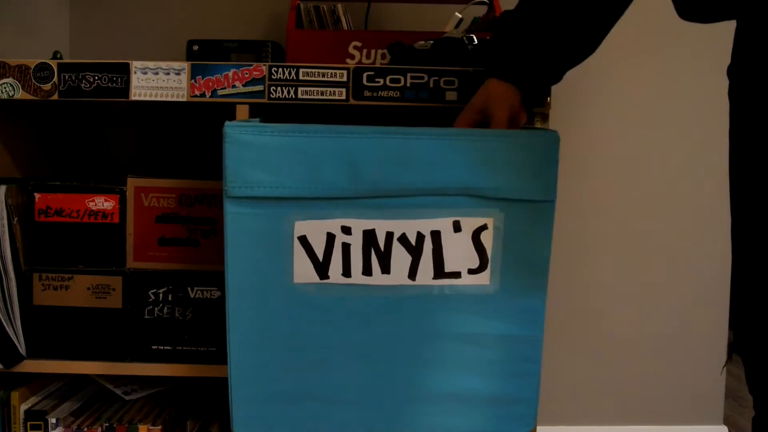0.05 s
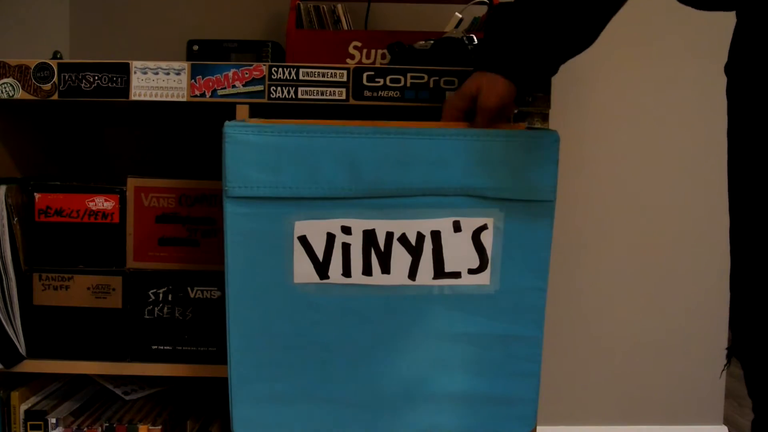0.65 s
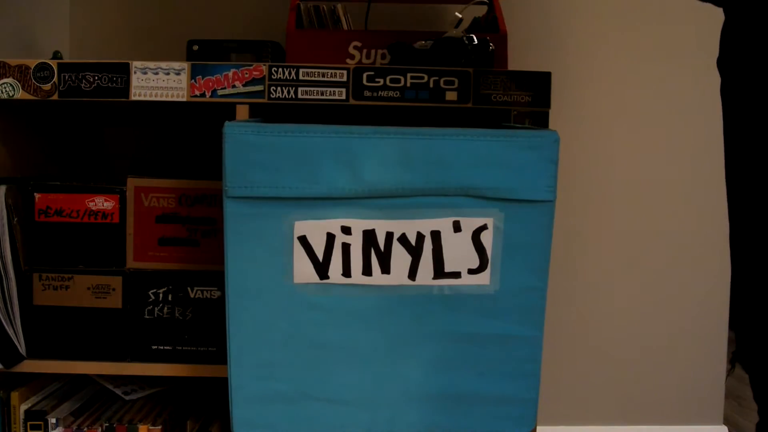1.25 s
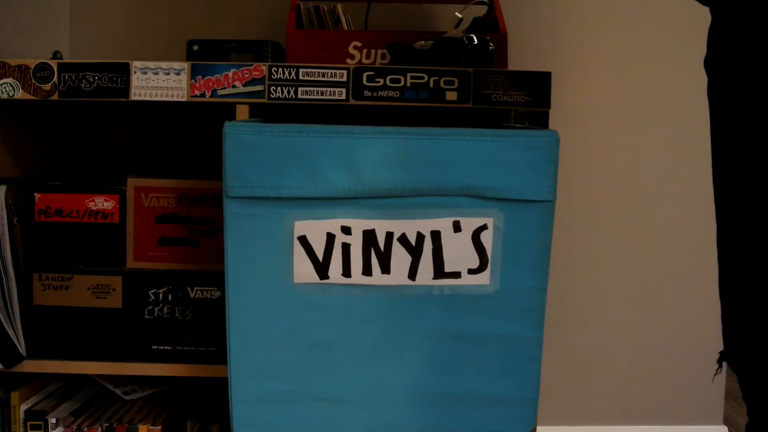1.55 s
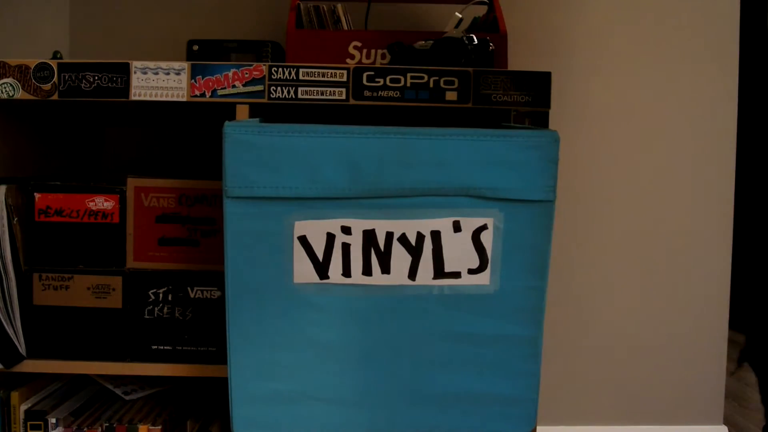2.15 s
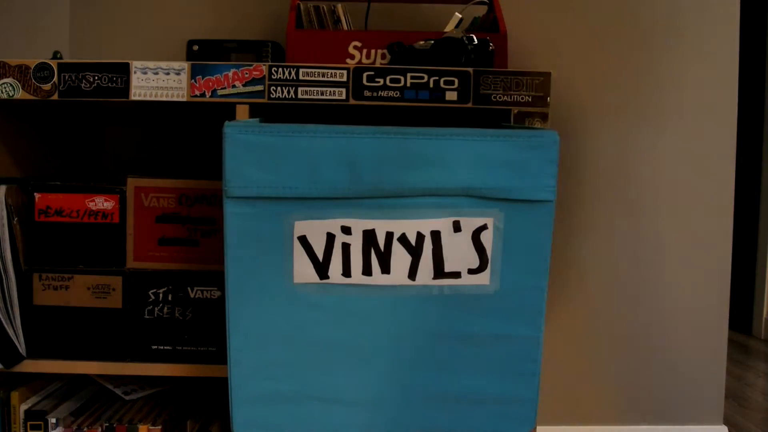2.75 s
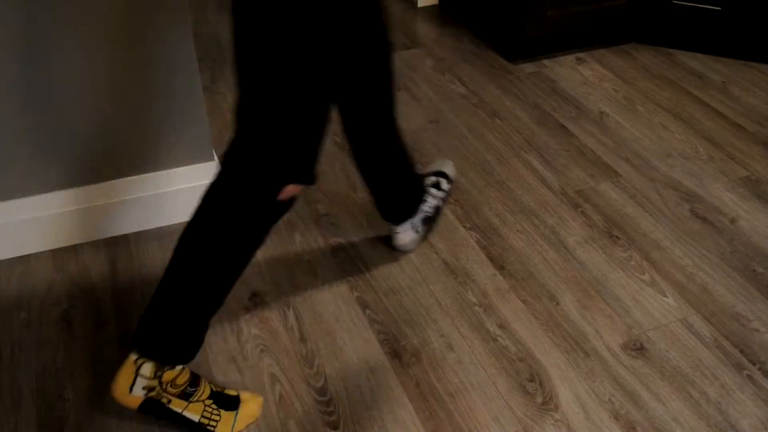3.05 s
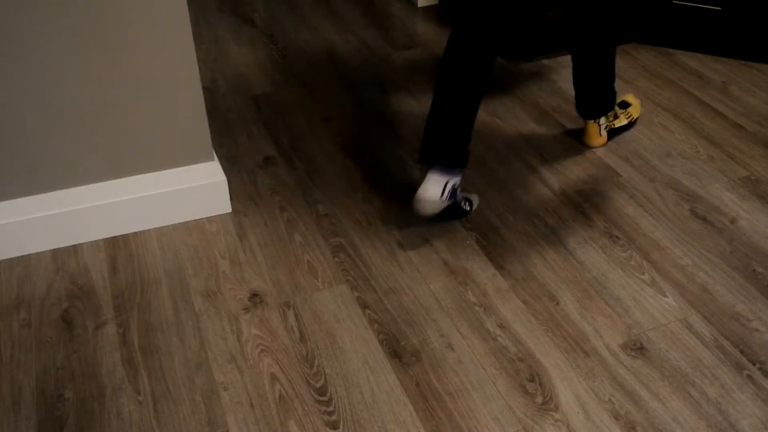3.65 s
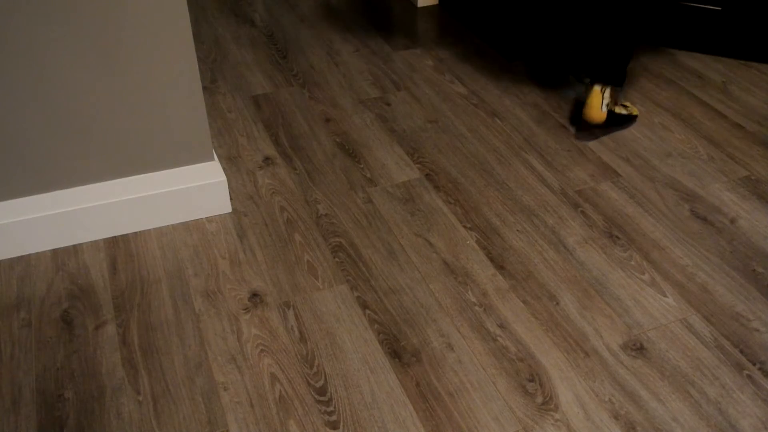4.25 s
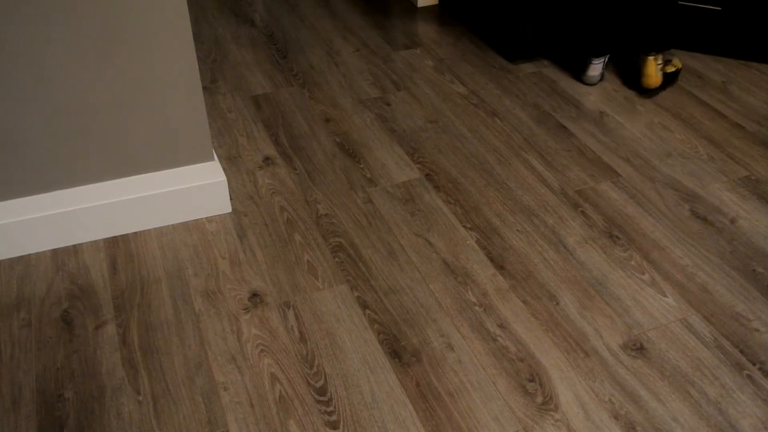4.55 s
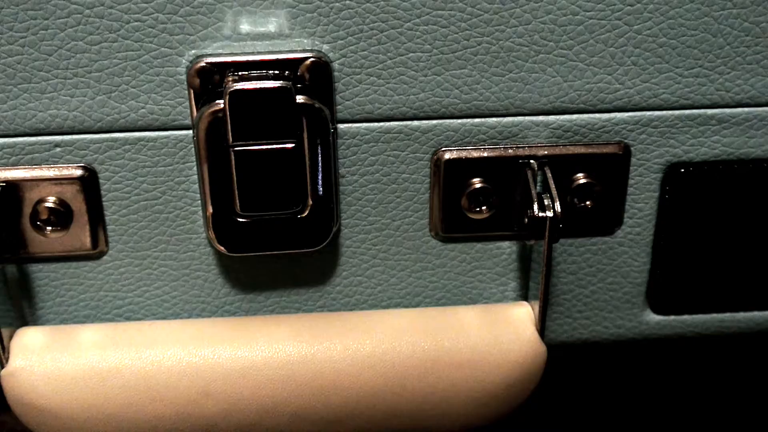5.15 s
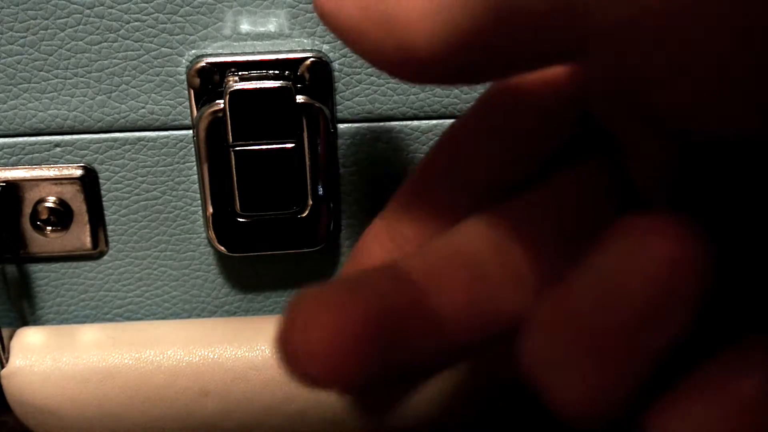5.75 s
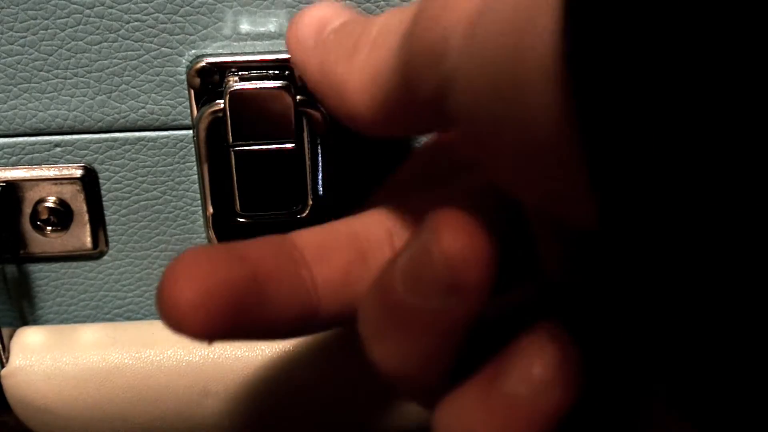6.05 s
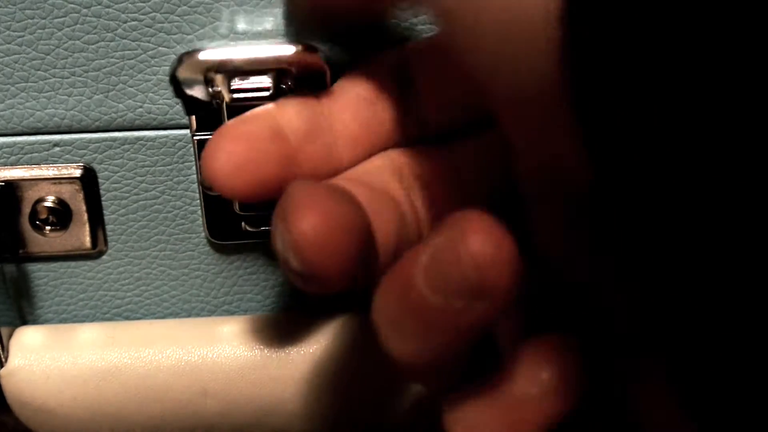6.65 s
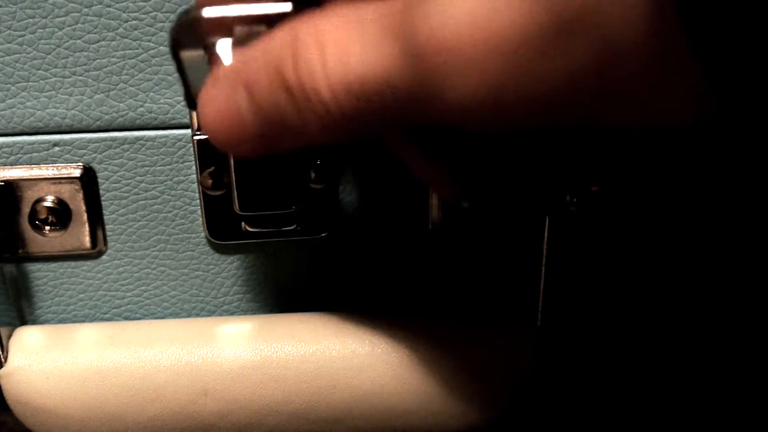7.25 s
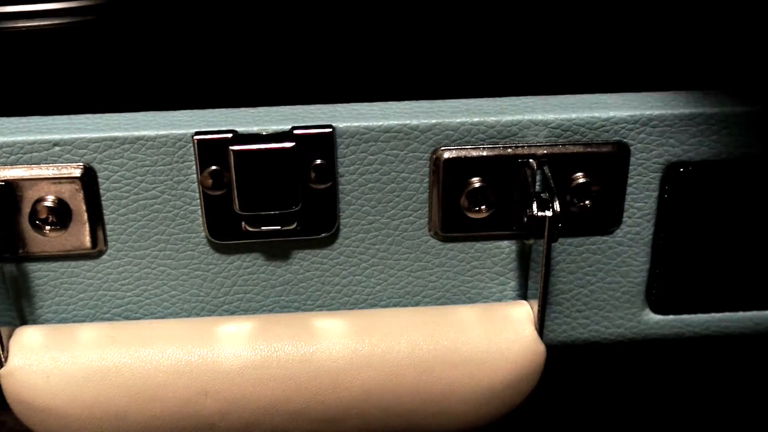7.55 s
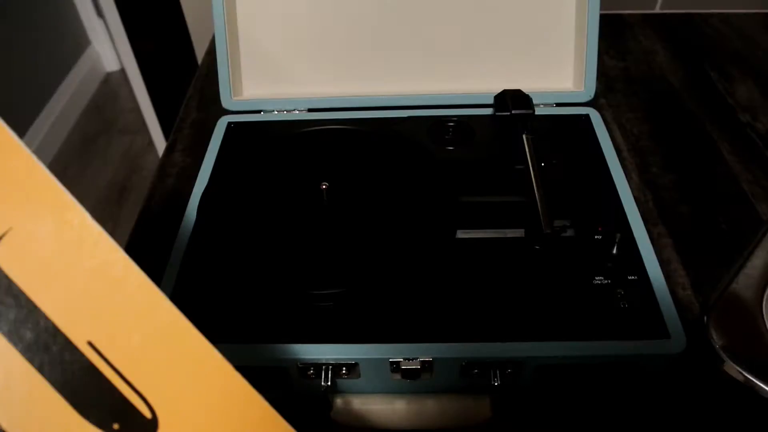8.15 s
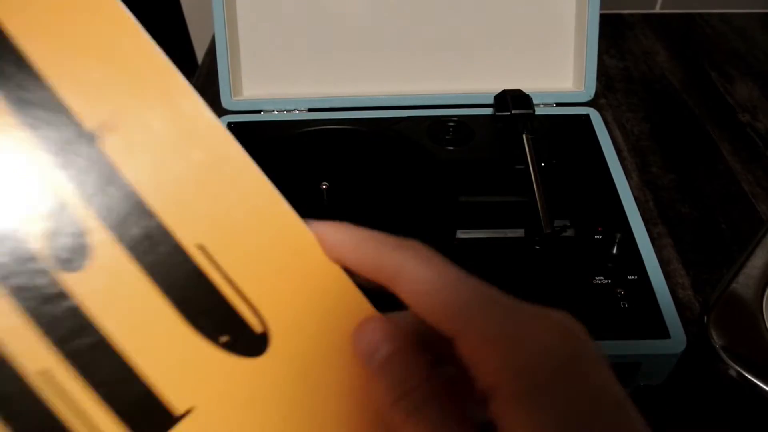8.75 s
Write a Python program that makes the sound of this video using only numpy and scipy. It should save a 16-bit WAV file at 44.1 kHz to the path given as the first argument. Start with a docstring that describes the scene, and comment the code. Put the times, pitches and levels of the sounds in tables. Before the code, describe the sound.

Quiet cardboard scraping and socked steps on creaky boards lead to one sharp latch snap and a lid's light knocks in a small room.

```python
"""A record sleeve rasps out of a fabric box, by stick-slip friction of card on cloth.
It is carried in socks across a laminate floor, whose loaded boards slip and creak.
Close by comes the loudest sound: the metal latch of a suitcase record player snaps open, its impacts
exciting the modes of steel and case. The lid is lifted, then the sleeve is handled again.
The room is small and fairly live, with a faint hum and hiss."""
import sys
import numpy as np
from scipy import signal
from scipy.fft import rfft, irfft, next_fast_len
from scipy.io import wavfile
from scipy.ndimage import uniform_filter1d

SR = 44100
rng = np.random.default_rng(int(sys.argv[2]) if len(sys.argv) > 2 else 0)


def master(y):
    """Save y as 16-bit WAV."""
    cut = np.clip(np.atleast_2d(y).T, -1, 1)
    pcm = np.round(cut * 32767)  # scale
    wavfile.write(sys.argv[1], SR, pcm.astype(np.int16))


N = 397341
TIME = np.arange(N) / SR
CUTOFF_HZ = 16000


# fingers and steel on the latch: (time [s], thump [dB], knock [dB], click [dB], contact time [s])
LATCH_CONTACTS = [(5.901, -38, -36.5, -26.5, 0.01), (6.03, -47.5, -55, -32, 0.0056),
                  (6.42, -54, -34, -22.5, 0.007), (6.4577, -37, -19, -44, 0.0017),
                  (6.4654, -45, -10.5, -6, 0.0022), (6.4699, -53, -24, -2, 0.0028)]
# modes of the steel: (frequency [Hz], level [dB], T60 [s])
STEEL_MODES = [(2170, -29, 0.5), (2403, -24, 0.95), (2530, 3.5, 0.041), (5870, 3.5, 0.03), (7200, 4, 0.03),
               (7600, 12, 0.018), (11150, 2, 0.069), (11300, 12.5, 0.008), (12300, 8, .014),
               (14300, 11, 0.009)]
# contact noise of steel: (frequency [Hz], spectral level [dB])
STEEL_SPECTRUM = [(500, -68), (1500, 4.5), (2500, 4), (3600, -3.5), (7000, 3.5), (9500, -1.5), (11500, 9),
                  (15500, 1)]

def latch():
    """Impact excitation: steel strikes steel, ringing its high modes and driving the case beneath."""
    onset, thump_db, knock_db, click_db, length = np.transpose(LATCH_CONTACTS)
    steel = ring(impacts(onset, click_db, length, chatter=0.73), STEEL_MODES)
    clicks = from_db(-1.5) * steel + from_db(-5) * contact_noise(onset, click_db, length, STEEL_SPECTRUM)
    return wooden_case(onset, thump_db, knock_db, length) + clicks * pan(left_db=5.5)


# fingers land on the case, the lid springs free and is lifted, the sleeve is set against it:
# (time [s], thump [dB], knock [dB], spot frequency [Hz], snap [dB], contact time [s])
LID_KNOCKS = [(5.874, -33.5, -32.5, 725, -49, 0.015), (5.9, -44, -27.5, 1360, -43, 0.009),
              (6.211, -44.5, -35, 644, -45.5, 0.017), (6.274, -51, -39, 900, -37.5, 0.0032),
              (6.315, -40, -31.5, 480, -38, 0.0097), (6.397, -41, -27, 910, -41, 0.012),
              (6.488, -38, -36, 76, -54, 0.012), (6.526, -40, -44, 124, -52, 0.0072),
              (7.065, -54, -36, 930, -62, 0.0023), (7.253, -50, -38.5, 800, -67, 0.013),
              (7.271, -40.5, -41, 190, -68, 0.02), (7.405, -33, -28.5, 594, -47, 0.022),
              (7.5202, -39, -38.5, 800, -30, 0.0062), (7.59, -51, -35.5, 364, -52, 0.029),
              (7.65, -31.5, -29.5, 606, -26.5, 0.0073), (7.658, -39, -34, 191, -46, 0.01),
              (7.676, -37, -34, 130, -41, 0.0093), (8.138, -58, -39.5, 382, -56, 0.0076),
              (8.538, -44, -40, 121, -39, 0.0066), (8.544, -43, -33.5, 460, -34.5, 0.019),
              (8.983, -41.5, -42, 240, -45, 0.015)]
# contact noise of lid and rim: (frequency [Hz], spectral level [dB])
SNAP_SPECTRUM = [(300, -8), (1200, 4.5), (2800, 10.5), (4500, 5.5), (8500, 1), (15000, -6.5)]

def lid(ring_cycles=10.7):
    """Local resonance: each knock has the pitch of the spot struck; lid and rim part with dry snaps."""
    onset, thump_db, knock_db, _, snap_db, length = np.transpose(LID_KNOCKS)
    spots = sum(struck_spot(at, db - 0.5, span, hz, t60=ring_cycles / hz)
                for at, _, db, hz, _, span in LID_KNOCKS)
    snaps = contact_noise(onset, snap_db, length, SNAP_SPECTRUM) * pan(left_db=4.5)
    return wooden_case(onset, thump_db, knock_db - 4.5, length) + spots + snaps


# modes of the wide panels: (frequency [Hz], level [dB], T60 [s])
WIDE_PANEL_MODES = [(71.5, -13, 0.26), (103, -14, 0.13), (135, -10.5, 0.19), (183, 0.5, 0.094),
                    (344, 0.5, 0.046)]
# modes of the stiff walls: (frequency [Hz], level [dB], T60 [s])
WALL_MODES = [(544, -4.5, 0.2), (687, -4, 0.12), (770, 14, 0.011), (990, -8, 0.034), (1400, -8, 0.055),
              (1900, -7, 0.016), (2250, -6, 0.024)]

def wooden_case(onset, thump_db, knock_db, length):
    """Plate vibration: wide panels thump in low modes, stiff walls knock in higher ones."""
    push = soften(impacts(onset, thump_db, length, chatter=0.81), top_hz=706)
    panels = band(ring(push, WIDE_PANEL_MODES), 45, CUTOFF_HZ)  # a small case radiates no deep bass
    walls = band(ring(impacts(onset, knock_db, length, chatter=1), WALL_MODES), 278, 4000)
    return (from_db(6) * panels + from_db(6.5) * walls) * pan(left_db=2)


# feet load the floor: (time [s], level [dB], duration [s], low-pass corner [Hz])
FOOT_LOADS = [(3.043, -45, 0.03, 4000), (3.104, -30, 0.017, 1400), (3.147, -25.5, 0.0048, 800),
              (3.167, -25, 0.003, 1000), (3.347, -36, 0.028, 1200), (3.667, -24, 0.1, 700),
              (4.167, -13.5, 0.039, 3500), (4.213, -21.5, 0.004, 1300), (4.647, -21, 0.032, 197),
              (4.837, -35, 0.024, 900)]
# modes of the boards: (frequency [Hz], level [dB], T60 [s])
LAMINATE_MODES = [(232, -7, 0.16), (319, -6.5, 0.088), (420, -2, 0.075), (475, 3.5, 0.071),
                  (548, 1.5, 0.041), (655, 2.5, 0.094), (803, -0.5, 0.1), (1456, -6, 0.073),
                  (2380, -3.5, 0.015), (3350, 0, 0.008)]

def floor_boards():
    """Stick-slip excitation: boards shift against each other under each step and ring in their modes."""
    force = sum(soften(slip_run(onset, db, length), top_hz) for onset, db, length, top_hz in FOOT_LOADS)
    return band(ring(force, LAMINATE_MODES), 150, CUTOFF_HZ) * from_db(5.5) * pan(left_db=1.5)


def slip_run(onset, db, length, count=16, gap_s=0.0062, jitter=0.208, slip_s=0.0029):
    """Relaxation oscillation: nearly regular slips share a step's energy and fade as the board settles."""
    gaps = gap_s * np.exp(jitter * rng.standard_normal(count))
    age = np.cumsum(gaps) - gaps[0]
    fade_db = -9 * (age / length) ** 2
    share_db = fade_db - 10 * np.log10(np.sum(from_db(fade_db) ** 2))
    return impacts(onset + age, db + share_db, np.full(count, slip_s), chatter=2.1)


# boards creak as the weight shifts: (time [s], frequency [Hz], level [dB], duration [s])
CREAKS = [(2.82, 417, -47.5, 0.029), (2.877, 449, -51, 0.075), (3.08, 474, -43, 0.057),
          (3.13, 488, -37.5, 0.072), (3.189, 526, -43, 0.048), (3.223, 618, -48.5, 0.065),
          (3.958, 428, -51, 0.085), (4.187, 429, -36, 0.041), (4.826, 534, -47.5, 0.032),
          (4.914, 1126, -49, 0.09), (4.915, 3310, -48, 0.035)]

def creaks():
    """Friction-induced vibration: a loaded board judders in phase and amplitude around one pitch."""
    out = np.zeros(N)
    for onset, hz, db, length in CREAKS:
        t = TIME[:int(length * SR)]
        tone = np.sin(2 * np.pi * hz * t + 1.1 * drift(170, len(t)))
        judder = from_db(3 * drift(300, len(t)))
        add_at(out, onset, from_db(db) * np.sin(np.pi * t / length) * tone * judder)
    return out


# the sleeve is loosened and drawn out: (time [s], duration [s], drone [dB], hiss [dB])
PULLS = [(0.385, 0.37, -64.5, -55), (0.61, 0.14, -60.5, -54), (0.695, 0.21, -50.5, -45),
         (0.89, 0.14, -51.5, -45), (1.05, 0.14, -65, -58), (1.22, 0.14, -83, -54.5),
         (1.385, 0.09, -76, -46.5), (1.55, 0.1, -60.5, -51.5), (1.68, 0.1, -66, -46.5),
         (1.785, 0.034, -60.5, -40.5)]
# card on fabric: (frequency [Hz], spectral level [dB])
PULL_SPECTRUM = [(47, -56), (80, -19), (182, -8.5), (265, -6), (400, -3), (601, -2), (718, -7.5),
                 (958, -5.5), (1220, -15.5), (2720, -17), (6450, -14), (13100, -12.5), (16000, -19)]

def sleeve_pulls():
    """Sliding friction: card snags on the fabric of the box with a papery grain."""
    return rubbing(PULLS, PULL_SPECTRUM, attack_s=0.037, release_s=0.035,
                   grain_db=1, rasp_db=1, catch_db=2, left_db=1)


# the sleeve slides through the hands: (time [s], duration [s], drone [dB], hiss [dB])
SLIDES = [(8.53, 0.097, -55.5, -52.5), (8.65, 0.17, -52, -51.5), (8.83, 0.11, -53, -41)]
# skin on card: (frequency [Hz], spectral level [dB])
SLIDE_SPECTRUM = [(60, -40), (114, -10), (152, -12.5), (471, -4.5), (672, -11), (839, -7.5), (1530, -12.5),
                  (1990, -5), (2430, -9), (12000, -11), (16000, -12)]

def sleeve_slides():
    """Sliding friction: card passes over skin with a nearly even grip."""
    return rubbing(SLIDES, SLIDE_SPECTRUM, attack_s=0.03, release_s=0.047,
                   grain_db=0.5, rasp_db=1, catch_db=1.5, left_db=1.5)


# trouser legs swing and socks slide: (time [s], duration [s], drone [dB], hiss [dB])
SWINGS = [(3.075, 0.1, -48.5, -41.5), (3.51, 0.13, -59.5, -49), (3.65, 0.13, -50.5, -48),
          (4.085, 0.23, -53.5, -46), (4.33, 0.11, -55, -41.5), (4.47, 0.076, -66, -45),
          (4.6, 0.073, -51, -48.5), (4.83, 0.12, -53.5, -49.5)]
# rubbed cloth: (frequency [Hz], spectral level [dB])
CLOTH_SPECTRUM = [(35, -45), (60, -35), (160, -3), (330, -14), (480, -1), (842, -0.5), (11800, -3.5),
                  (14600, -7), (16000, -14)]

def clothing():
    """Fibre friction: cloth gives broadband swishes that swell and fade gently."""
    return rubbing(SWINGS, CLOTH_SPECTRUM, attack_s=0.052, release_s=0.086,
                   grain_db=1, rasp_db=2, catch_db=0.9, left_db=0.7)


# fingers brush the case: (time [s], duration [s], drone [dB], hiss [dB])
BRUSHES = [(5.39, 0.22, -62.5, -52.5), (5.6, 0.75, -64.5, -58.5), (6.52, 0.2, -51.5, -55),
           (6.8, 0.14, -63.5, -50), (6.96, 0.28, -61.5, -54.5), (7.22, 0.487, -54, -54.5),
           (7.87, 0.26, -55.5, -54), (8.007, 0.053, -51.5, -42)]
# skin on the case: (frequency [Hz], spectral level [dB])
BRUSH_SPECTRUM = [(29, -41), (50, -13), (114, -5.5), (330, -2.5), (495, -5), (950, -4.5), (4560, -10.5),
                  (14900, -5.5), (16000, -8)]

def finger_brushes():
    """Sliding friction: skin grips the case unevenly, with little rasp."""
    return rubbing(BRUSHES, BRUSH_SPECTRUM, attack_s=0.028, release_s=0.024,
                   grain_db=1.96, rasp_db=-3, catch_db=0.8, left_db=0.5)


def rubbing(strokes, spectrum, attack_s, release_s, grain_db, rasp_db, catch_db, left_db):
    """Stick-slip noise: one uneven grip modulates the body's drone, the ridges' rasp and fibre hiss."""
    onsets, lengths, *levels = np.transpose(strokes)
    size = 3 * SR
    t = onsets[0] + TIME[:size]
    drone, hiss = [stroke_gain(t, onsets, lengths, db, attack_s, release_s) for db in levels]
    grip = unit_rms(from_db(grain_db * (drift(900, size) + 0.5 * drift(70, size))))
    friction = colour(stereo_noise(size) * grip, spectrum)
    shudder = unit_rms(from_db(0.5 * grain_db * drift(34.7, size)))  # the whole sheet slips more slowly
    body = drone * shudder * unit_rms(band(friction, 57, 1140))
    catches = from_db(catch_db * drift(140, size))  # stiff ridges snag
    ridges = from_db(rasp_db) * np.sqrt(drone * hiss) * unit_rms(catches * band(friction, 1300, 4160))
    fibres = hiss * unit_rms(band(friction, 4800, 14500))
    brightness = (hiss / from_db(-27)) ** 0.66  # faster strokes are brighter
    sheen = hiss * brightness * unit_rms(band(stereo_noise(size) * grip, 12500, CUTOFF_HZ))
    rub = (body + ridges + fibres + sheen) * pan(left_db)
    return np.pad(rub, [(0, 0), (int(onsets[0] * SR), N)])[:, :N]


def stroke_gain(t, onsets, lengths, levels_db, attack_s, release_s):
    """Incoherent addition: strokes rise, hold and decay, and overlapping ones add in power."""
    age = t - onsets[:, None]
    rise = np.sin(np.pi / 2 * np.clip(age / attack_s, 0, 1))
    fall = np.exp(-np.maximum(age - lengths[:, None], 0) / release_s)
    return np.linalg.norm(from_db(levels_db)[:, None] * rise * fall, axis=0)


# the sleeve bumps the box: (time [s], frequency [Hz], level [dB], contact time [s])
BUMPS = [(.661, 270, -41, 0.0046), (0.666, 130, -47.5, 0.012), (1.553, 236, -51.5, 0.0028)]
# the sleeve drags on the rim: (time [s], duration [s], start pitch [Hz], end pitch [Hz], level [dB])
DRAGS = [(0.718, 0.082, 227, 293, -48.5), (0.797, 0.084, 333, 418, -46), (0.903, 0.081, 315, 245, -47),
         (0.925, 0.087, 2500, 3030, -49), (0.992, 0.12, 255.6, 221, -56), (1.457, 0.097, 437, 397, -63),
         (1.578, 0.015, 3270, 3520, -43.5)]

def fabric_box(relative_bandwidth=0.36):
    """Resonance: bumps ring the hollow box; drags make it groan, or the card edge rasp, in a glide."""
    out = sum(struck_spot(onset, db, length, hz, t60=0.13) for onset, hz, db, length in BUMPS)
    for onset, length, start_hz, end_hz, db in DRAGS:
        size = int(length * SR)
        phase = 2 * np.pi * np.cumsum(np.geomspace(start_hz, end_hz, size)) / SR
        groan = sum(drift(relative_bandwidth * start_hz, size) * wave(phase) for wave in (np.sin, np.cos))
        add_at(out, onset, from_db(db) * np.sin(np.linspace(0, np.pi, size)) * unit_rms(groan))
    return out * pan(left_db=0)


# sleeve edges tap and catch: (time [s], knock [dB], snap [dB], contact time [s])
TAPS = [(0.152, -44, -44.5, 0.016), (1.552, -68, -42, 0.035), (1.577, -58, -37.5, 0.011),
        (1.64, -70, -45.5, 0.012), (2.271, -71, -53, 0.024), (8.69, -48, -50, 0.013)]
# modes of the sleeve: (frequency [Hz], level [dB], T60 [s])
SLEEVE_MODES = [(224, -7, 0.2), (412, -1, 0.061), (607, 15, 0.039), (656, 18, 0.019)]
# contact noise of stiff edges: (frequency [Hz], spectral level [dB])
EDGE_SPECTRUM = [(1500, -4), (2800, -2), (6000, 2.5), (15000, -5.5)]

def sleeve_taps():
    """Damped vibration: the cardboard knocks dully as its edges snap."""
    onset, knock_db, snap_db, length = np.transpose(TAPS)
    knocks = from_db(9) * ring(impacts(onset, knock_db, length, chatter=1), SLEEVE_MODES)
    return (knocks + contact_noise(onset, snap_db, length, EDGE_SPECTRUM)) * pan(left_db=2)


# floor joints, card edges and the hasp tick: (time [s], level [dB], duration [s])
TICKS = [(1.4, -56, 0.011), (3.1105, -25.5, 0.001), (3.177, -28, 0.0027), (4.171, -41, 0.025),
         (7.347, -33, 0.0074), (8.409, -35, .003)]

def thin_ticks():
    """Sudden release: tiny stiff edges let go in bright transients, too slight to stir the room."""
    return contact_noise(*np.transpose(TICKS), EDGE_SPECTRUM) * pan(left_db=6.5)


# reverberation time: (frequency [Hz], T60 [s])
REVERB_T60 = [(100, 0.35), (500, 0.6), (1500, 0.78), (3000, 0.72), (6000, 0.81), (12000, 1)]
# colour of the echoes: (frequency [Hz], level [dB])
REVERB_SPECTRUM = [(80, -1.5), (330, -0.5), (600, -0.5), (1100, 0.5), (2600, 4), (3700, 2), (7000, -0.5),
                   (10000, -13), (15000, -19)]

def reverberation(x, build_s=0.00048, feed_db=-36):
    """Diffuse field: each band stores the energy that reaches it and loses it exponentially."""
    noise, edges = stereo_noise(), np.geomspace(50, 16000, 14)
    build = np.exp(-1 / (build_s * SR))
    out = np.zeros((2, N))
    for low, high in zip(edges, edges[1:]):
        hz = np.sqrt(low * high)
        retained = from_db(-60 / (at_hz(REVERB_T60, hz) * SR)) ** 2
        power = band(x + 1e-12 * noise[0], low, high) ** 2
        energy = signal.lfilter([1 - build], np.poly([retained, build]), power)
        echoes = band(noise, low, high) * np.sqrt(SR / 2 / (high - low))
        out += from_db(feed_db + at_hz(REVERB_SPECTRUM, hz)) * np.sqrt(np.abs(energy)) * echoes
    return out


# the hiss steps in level and dips briefly near the start: (time [s], level [dB])
HISS_LEVELS = [(0, -58), (0.22, -63), (0.35, -58.5), (3.037, -46), (5.2, -52), (8.172, -54.5)]
# noise of the still room: (frequency [Hz], spectral level [dB])
AIR_SPECTRUM = [(18, -40), (32, 5), (48, -2), (65, -2.5), (158, -11.5), (241, -10), (319, -11.5),
                (1000, -11.5), (1440, -14.5), (2140, -14.5), (4940, -17), (11400, -17.5), (16000, -20)]
# low hum: (frequency [Hz], level [dB])
HUM_TONES = [(65, -84.5), (99, -81.5)]

def still_room(crossover_hz=117, rumble_share=0.64):
    """Ambient noise: hiss steps in level, rumble follows a share of each step, and two tones hum."""
    onsets, levels_db = np.transpose(HISS_LEVELS)
    hiss_db = uniform_filter1d(levels_db[np.searchsorted(onsets[1:], TIME)], size=600)
    air = unit_rms(colour(stereo_noise(), AIR_SPECTRUM))
    hiss = from_db(hiss_db) * band(air, crossover_hz, SR / 2)
    wide_air = unit_rms(colour(stereo_noise(side_db=6.5), AIR_SPECTRUM))
    rumble = from_db(-67.5 + rumble_share * (hiss_db - levels_db[0])) * soften(wide_air, crossover_hz)
    hum = sum(from_db(db) * np.sqrt(2) * np.sin(2 * np.pi * hz * TIME + 0.23 * drift(5))
              for hz, db in HUM_TONES)
    return (hiss + rumble + hum) * pan(left_db=0.5)


def impacts(onsets, levels_db, lengths, chatter):
    """Contact force: an impulse and a decaying chatter of slips; longer contacts chatter more."""
    force, t = np.zeros(N + SR), TIME[:SR // 3]
    for onset, db, length in zip(onsets, levels_db, lengths):
        slips = rng.standard_normal(len(t)) * np.exp(-t / length)
        slip_share = np.clip(chatter * length ** 2 / (length ** 2 + 0.004 ** 2), 0, 1)
        push = np.sqrt(slip_share / np.sum(slips ** 2)) * slips
        push[0] += np.sqrt(1 - slip_share)
        add_at(force, onset, from_db(db) * push)
    return force[:N]


def contact_noise(onsets, levels_db, lengths, spectrum, rise_s=0.0002):
    """Direct radiation: touching surfaces emit a brief burst of noise."""
    out, t = np.zeros((2, N + SR)), TIME[:SR // 8]
    for onset, db, length in zip(onsets, levels_db, lengths):
        burst = np.exp(-2 * t / length) * (1 - np.exp(-t / rise_s))
        noise = unit_rms(colour(stereo_noise(len(t), side_db=-2.5), spectrum))
        add_at(out, onset, from_db(db) * burst / burst.max() * noise)
    return out[:, :N]


def ring(force, modes):
    """Modal superposition: the force is convolved with a sum of damped cosines scaled to peak 1."""
    t = TIME[:SR // 2]
    response = sum(from_db(db - 60 * t / t60) * np.cos(2 * np.pi * hz * t) for hz, db, t60 in modes)
    response = signal.lfilter([1], [1, -0.5], response)  # the contact's width rounds the first edge
    return signal.fftconvolve(force, response / np.abs(response).max())[:N]


def struck_spot(onset, db, length, hz, t60):
    """Damped oscillator: one contact rings a patch of wall in a single mode."""
    return ring(impacts([onset], [db], [length], chatter=0.69), [(hz, 0, t60)])


# stereo width: (frequency [Hz], side relative to mid [dB])
SIDE_SPECTRUM = [(60, -9), (500, -7), (1000, -5.5), (2000, -3), (5000, -0.5), (15000, 0)]

def stereo_noise(size=N, side_db=0):
    """Partial coherence: noise alike in both channels in the bass, diffuse in the treble."""
    mid, side = rng.standard_normal((2, size))
    return mid + from_db(side_db) * colour(side, SIDE_SPECTRUM) * np.array([[1], [-1]])


def colour(x, spectrum):
    """Spectral shaping: each frequency is weighted by the table's level."""
    size = next_fast_len(x.shape[-1])
    hz = np.arange(size // 2 + 1) * SR / size
    return irfft(rfft(x, size) * from_db(at_hz(spectrum, hz)), size)[..., :x.shape[-1]]


def soften(x, top_hz):
    """Low-pass filtering, as by a soft contact that passes no quick changes."""
    return signal.sosfilt(signal.butter(2, min(top_hz, SR / 3), fs=SR, output="sos"), x + 1e-18)


def band(x, low_hz, high_hz):
    """Band-pass filtering."""
    return signal.sosfilt(signal.butter(3, [low_hz, min(high_hz, 0.49 * SR)], "band", fs=SR, output="sos"), x)


def drift(per_s, size=N):
    """Random modulation of rms 1, interpolated between per_s values a second."""
    knots = rng.standard_normal(N // 8)
    return unit_rms(np.interp(TIME[:size] * per_s, np.arange(len(knots)), knots))


def at_hz(points, hz):
    """Interpolation on a log-frequency axis."""
    frequencies, values = np.transpose(points)
    return np.interp(np.log(np.maximum(hz, 1)), np.log(frequencies), values)


def add_at(out, onset, sound):
    """Superposition from the onset [s] on."""
    start = int(onset * SR)
    out[..., start:start + sound.shape[-1]] += sound


def pan(left_db):
    """Level difference between channels, as two gains."""
    return from_db(np.array([[0.5], [-0.5]]) * left_db)


def from_db(db):
    """Decibels to amplitude ratio."""
    return 10 ** (np.asarray(db) / 20)


def unit_rms(x):
    """Normalisation to rms 1."""
    return x / np.sqrt(np.mean(x ** 2) + 1e-20)


def scene():
    """Direct-to-reverberant ratio: near things sound dry, the steps further off stir the room more."""
    taps = sleeve_taps() + fabric_box()
    steps = floor_boards() + creaks()
    case = latch() + lid()
    room_feed = from_db(-3) * taps + from_db(-1.5) * steps + from_db(-6) * case
    echoes = reverberation(room_feed.mean(axis=0)) * pan(left_db=1)
    rubs = sleeve_pulls() + clothing() + finger_brushes() + sleeve_slides()
    return taps + steps + case + echoes + rubs + thin_ticks() + still_room()


def record(dry):
    """Gating, clipping, band limiting: the sound drops out briefly, peaks are capped, the top is cut."""
    gate = np.interp(TIME, [8.152, 8.166, 8.185, 8.193], [1, 0, 0, 1])
    low_pass = signal.ellip(10, 0.1, 70, CUTOFF_HZ, fs=SR, output="sos")
    return signal.sosfilt(low_pass, np.clip(dry * gate, -1, 1))


dry = scene()
out = record(dry)
master(out)
```